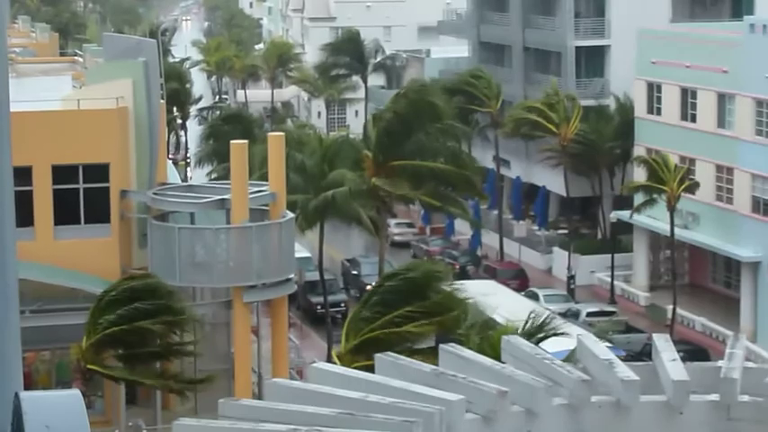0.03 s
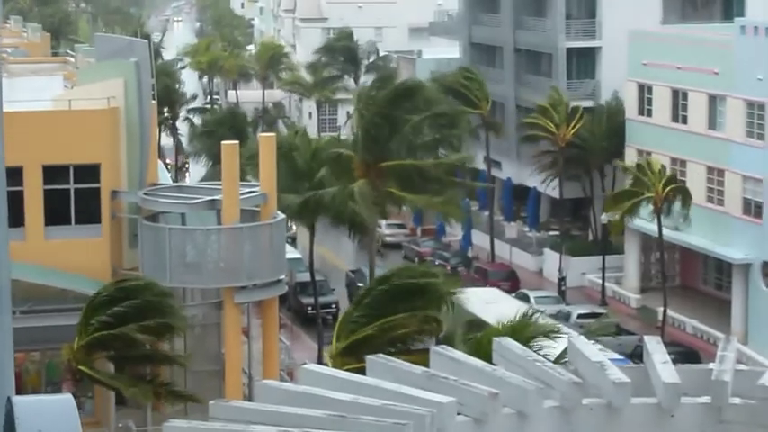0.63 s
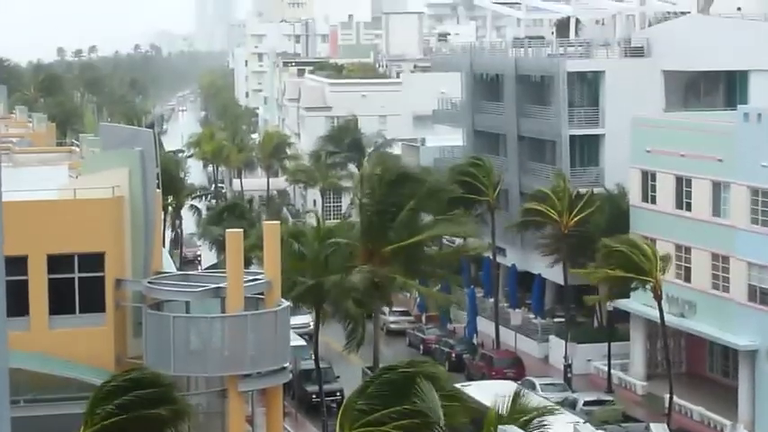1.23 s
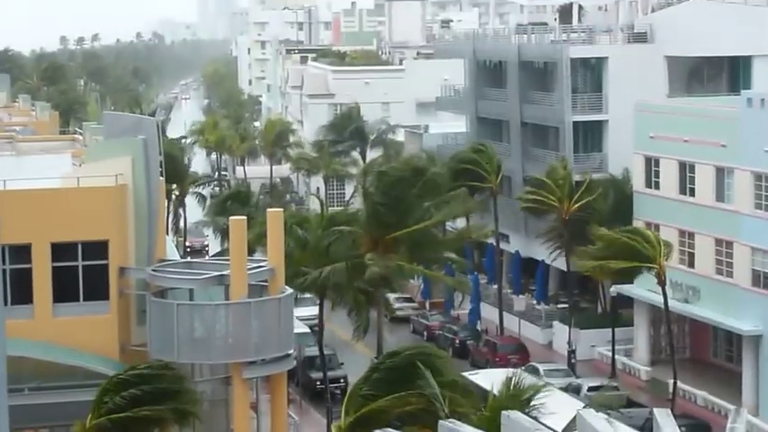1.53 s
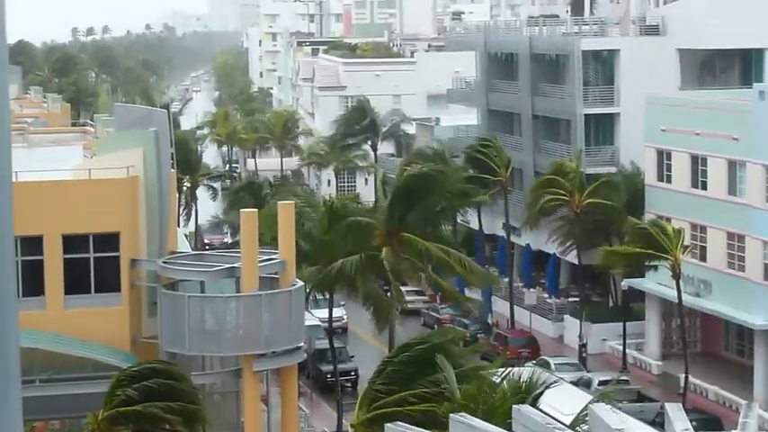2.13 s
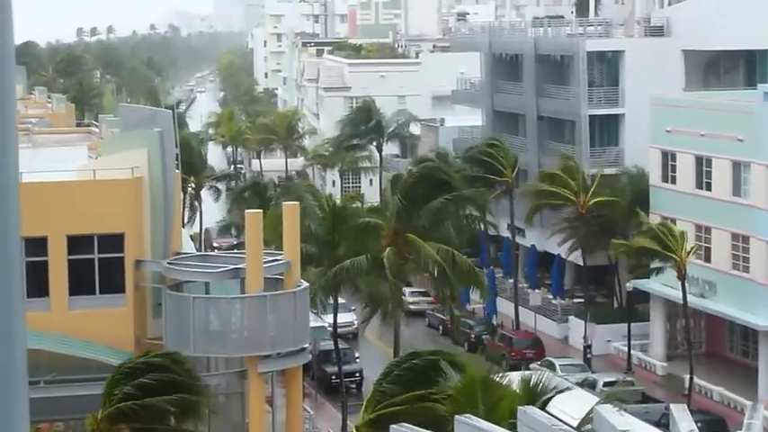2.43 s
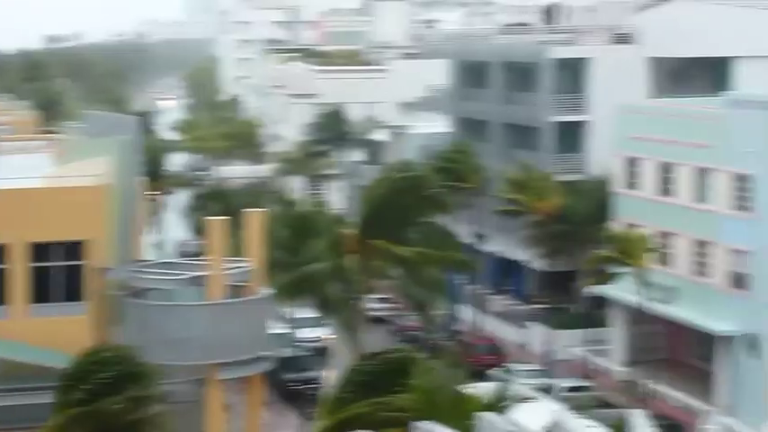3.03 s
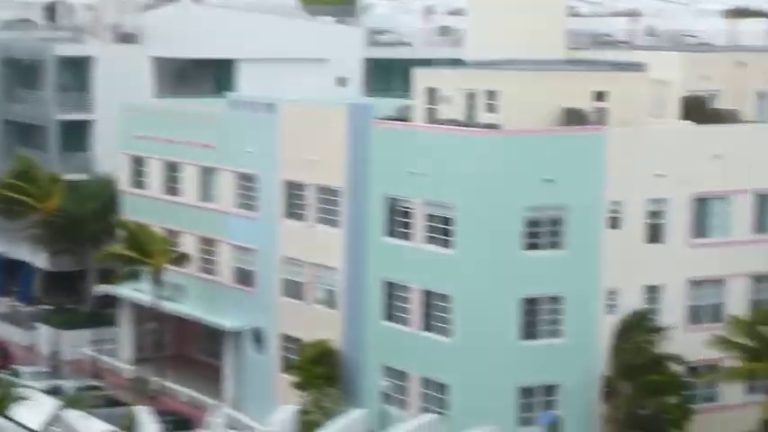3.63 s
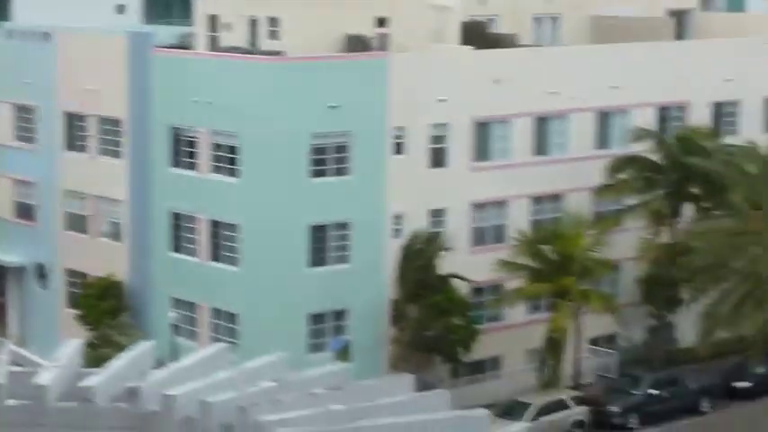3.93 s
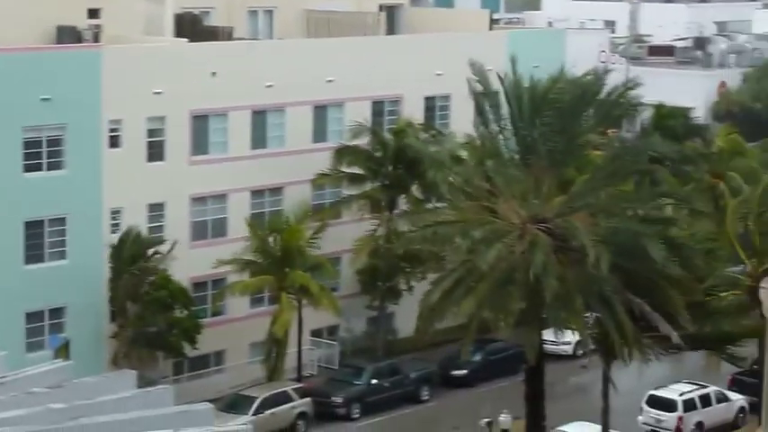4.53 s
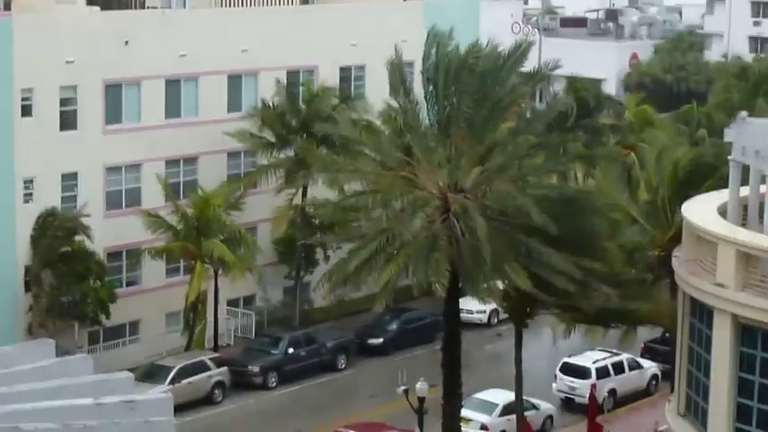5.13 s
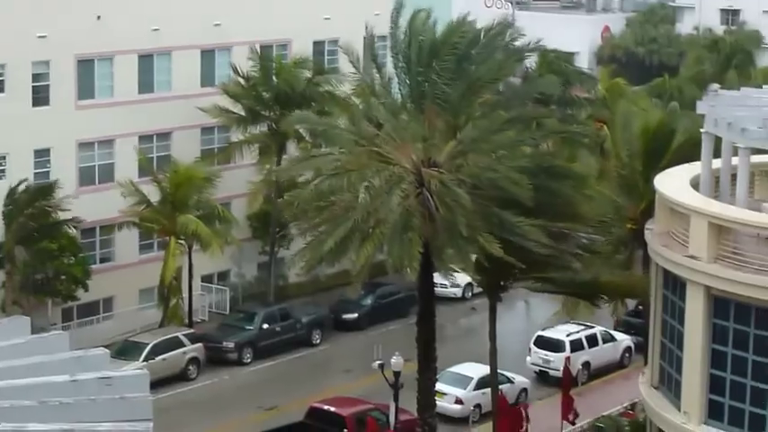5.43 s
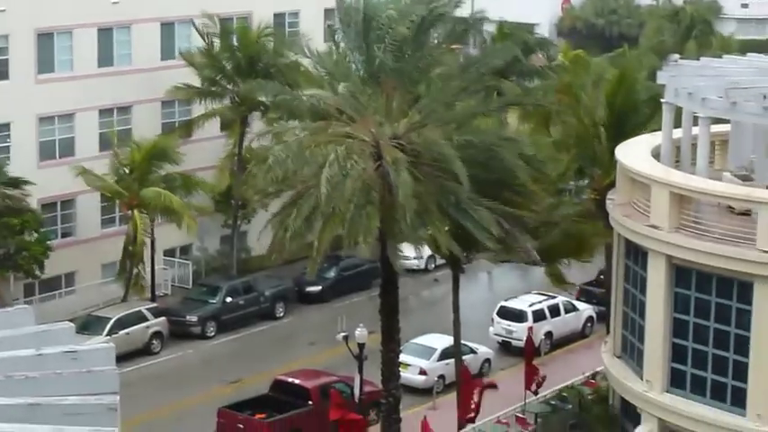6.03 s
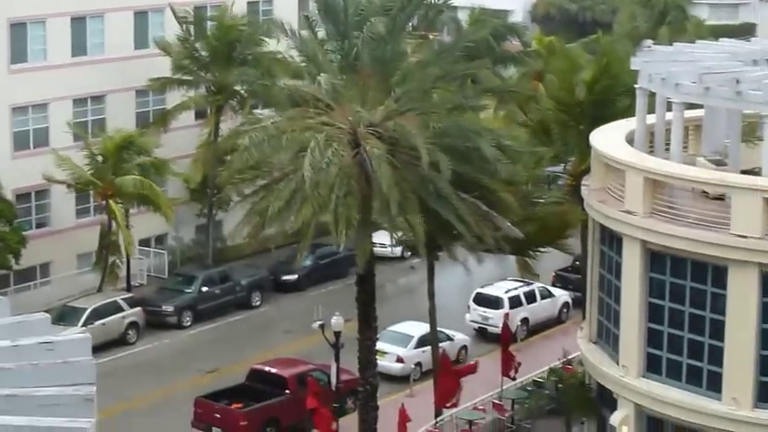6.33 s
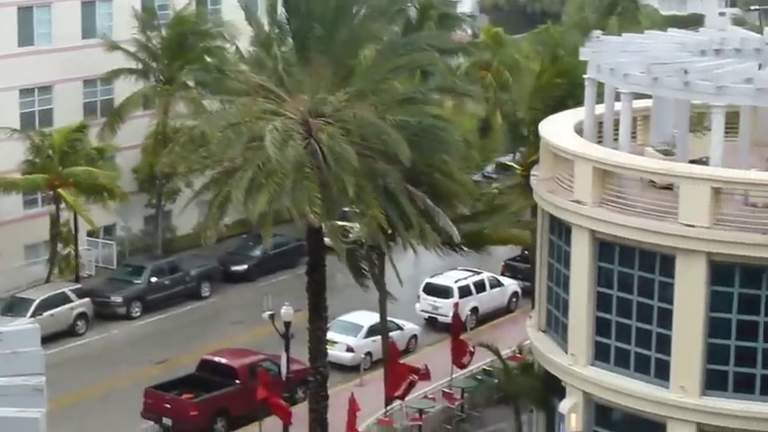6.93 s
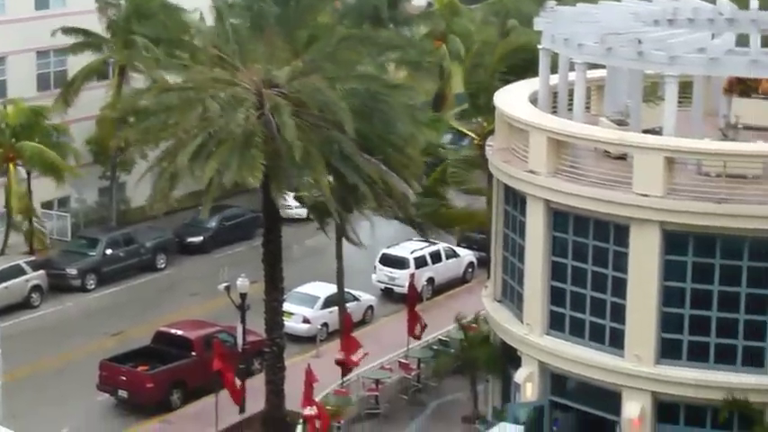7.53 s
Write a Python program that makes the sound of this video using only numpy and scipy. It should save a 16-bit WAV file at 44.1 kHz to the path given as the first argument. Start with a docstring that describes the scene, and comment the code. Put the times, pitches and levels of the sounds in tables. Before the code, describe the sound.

Gusty wind thumps against the microphone over a deep outdoor roar and the hiss of thrashing palm leaves, briefly whistling.

```python
"""Storm wind on a roof terrace.

Below, the air roars between the buildings and hisses through a street of palms; now and then it
whistles thinly at an edge. Right at the microphone, eddies hit the two ports as short low thuds,
vortices moan and one drop ticks on the housing. The limiter ducks the rush under the hardest blasts."""
import sys
import numpy as np
from scipy import signal
from scipy.io import wavfile
from scipy.ndimage import uniform_filter1d

SR = 44100
rng = np.random.default_rng(int(sys.argv[2]) if len(sys.argv) > 2 else 0)


def file_out(sig):
    """Save sig as 16-bit WAV at sys.argv[1]."""
    # one column per channel
    cols = np.atleast_2d(sig).T
    # limit, then scale
    lim = np.clip(cols, -1, 1)
    pcm = np.round(lim * 32767).astype(np.int16)
    wavfile.write(sys.argv[1], SR, pcm)


N = 343539
CUTOFF_HZ = 8742   # top of the recorder's range

# how alike the street sounds at the two ports: (frequency [Hz], left-right correlation [-1..1])
RUSH_LIKENESS = [(60, 0.99), (250, 1), (560, 0.98), (870, 0.96), (1370, 0.74), (2130, 0.58), (3330, 0.4),
                 (5210, 0.43), (8000, 0.77)]


def from_db(db):
    """Decibels to gain."""
    return 10 ** (np.asarray(db) / 20)


def rms_one(x):
    """Scaled to an rms of 1."""
    return x / np.sqrt(np.mean(x ** 2) + 1e-20)


def panned(pan_db):
    """Left and right gains, the left louder by pan_db."""
    return from_db(np.array([[.5], [-.5]]) * pan_db)


def in_time(rows):
    """The columns of a curve at every sample."""
    s, *columns = np.transpose(rows)
    return [np.interp(np.arange(N) / SR, s, column) for column in columns]


def at_hz(points, hz):
    """A spectrum's value at these frequencies."""
    points_hz, values = np.transpose(points)
    return np.interp(np.log(hz), np.log(points_hz), values)


def around(s, half_s):
    """The samples that a swell at s reaches."""
    start, stop = np.clip([(s - 4 * half_s) * SR, (s + 4 * half_s) * SR], 0, N)
    return slice(int(start), int(stop))


def swell(s, half_s):
    """A smooth rise and fall around s, at a quarter of its height half_s away."""
    out, near = np.zeros(N), around(s, half_s)
    t = np.arange(near.start, near.stop) / SR
    out[near] = np.exp(-np.log(4) * ((t - s) / half_s) ** 2)
    return out


def drift(rate_hz):
    """A random wander with an rms of 1, mostly slower than rate_hz."""
    hop = 40
    pole = np.exp(-2 * np.pi * rate_hz * hop / SR)
    noise = rng.standard_normal(N // hop + 2002)
    slow = signal.lfilter([1], [1, -2 * pole, pole * pole], noise)[2000:]   # once settled
    return np.interp(np.arange(N) / hop, np.arange(len(slow)), rms_one(slow))


def noise_bands(spectrum, likeness, low_hz, count):
    """Half-octave bands of stereo noise whose powers add up to 1: (centres [Hz], bands)."""
    edges = low_hz * 2 ** (np.arange(count + 1) / 2)
    centres, bands = np.sqrt(edges[1:] * edges[:-1]), []
    gains = from_db(at_hz(spectrum, centres)) * np.sqrt(centres)
    for low, high, hz, gain in zip(edges, edges[1:], centres, gains / np.linalg.norm(gains)):
        band_pass = signal.butter(3, [low, high], "band", fs=SR, output="sos")
        mid, side = rms_one(signal.sosfilt(band_pass, rng.standard_normal((2, N))))
        alike = np.clip(at_hz(likeness, hz), -1, 1)
        stereo = np.sqrt((1 + alike) / 2) * mid + np.sqrt((1 - alike) / 2) * side * [[1], [-1]]
        bands.append(gain * stereo)
    return centres, bands


def street_roar(level_db, patchy_db):
    """The far, deep rush of air between the buildings reaches both ports nearly alike."""
    # colour of the roar: (frequency [Hz], relative density [dB])
    spectrum = [(25, -18.5), (55, -12.5), (100, -1), (170, 0.5), (240, 0.5), (340, -2.5), (480, -4.5),
                (680, -5.5), (900, -10), (1200, -17.5), (1700, -17.5), (3000, -31), (8000, -52)]
    _, bands = noise_bands(spectrum, RUSH_LIKENESS, low_hz=25, count=15)
    return sum(band * from_db(patchy_db * drift(4.6)) for band in bands) * from_db(level_db)


def frond_hiss(level_db, calm_top_db, sizzle_hz, flutter_db, patchy_db):
    """Palm leaves thrash below the terrace: a wide hiss that flutters, its top coming and going."""
    # colour of the hiss: (frequency [Hz], relative density [dB])
    spectrum = [(500, -15.5), (1000, 5.5), (1500, 0), (2200, -1), (3200, -0.5), (4700, -1.55), (6700, -6)]
    # the top of the hiss flares up: (time [s], half-length [s], rise [dB])
    sizzles = [(1.985, 0.21, 9.5), (3.893, 0.068, 5), (4.07, 0.27, 7)]
    sizzle_db = calm_top_db + sum(rise_db * swell(s, half_s) for s, half_s, rise_db in sizzles)
    centres, bands = noise_bands(spectrum, RUSH_LIKENESS, low_hz=500, count=8)
    top_share = 1 / (1 + (sizzle_hz / centres) ** 6)
    hiss = sum(band * from_db(share * sizzle_db + patchy_db * drift(8.6))
               for share, band in zip(top_share, bands))
    return hiss * from_db(level_db + flutter_db * drift(25))


def edge_whistle(waver_hz, flutter_db, pan_db):
    """Wind at an edge: a thin, wavering whistle that swells and fades at a steady rate in dB."""
    # swells of the whistle: (time [s], half-length [s], top level [dB], pitch [Hz])
    whistles = [(0.0, 0.11, -46, 4950), (1.27, .22, -48.5, 4950), (1.63, .18, -51.5, 4958),
                (1.98, .13, -56, 4560), (3.0, 0.13, -55.5, 4922), (3.17, .22, -44.5, 4922)]
    t, tone = np.arange(N) / SR, 0
    waver_cycles = waver_hz * np.cumsum(drift(65)) / SR
    for s, half_s, level_db, hz in whistles:
        envelope = from_db(level_db) * np.exp(-np.log(4) * np.abs(t - s) / half_s)
        tone += np.sqrt(2) * np.sin(2 * np.pi * (hz * t + waver_cycles)) * envelope
    flutter = rms_one(from_db(flutter_db * drift(50)))
    return tone * flutter * panned(pan_db)


def housing_drop(low_hz):
    """A drop hits the microphone housing: one dry tick with no bass."""
    # the impact: (time [s], nominal peak [dB])
    impacts = [(5.28, -3.5)]
    click = np.zeros(N)
    for s, peak_db in impacts:
        # scaled up, as only the part under the cut-off is heard
        click[round(s * SR)] = -from_db(peak_db) * SR / (2 * CUTOFF_HZ)
    return signal.sosfilt(signal.butter(1, low_hz, "high", fs=SR, output="sos"), click)


def vortex_moans(sag_hz_per_s, flutter_db, flutter_hz):
    """Each slowing vortex at the microphone gives a short, throbbing low tone that sags in pitch."""
    # vortices: (time [s], half-length [s], level [dB], pitch [Hz], left over right [dB])
    vortices = [(0.06, 0.014, -19, 257.2, 2), (0.447, 0.013, -23, 287, -3), (6.45, 0.023, -21, 273, 1),
                (6.889, .037, -24.5, 241.6, 2), (6.965, 0.043, -27, 133.5, 2), (7.68, 0.016, -34, 210, 1)]
    t, out = np.arange(N) / SR, 0
    for s, half_s, level_db, hz, pan_db in vortices:
        pitch_hz = np.clip(hz - sag_hz_per_s * (t - s), 60, 320)
        tone = np.sqrt(2) * np.sin(2 * np.pi * np.cumsum(pitch_hz) / SR)
        out += tone * from_db(level_db) * swell(s, half_s) * panned(pan_db)
    return out * from_db(flutter_db * drift(flutter_hz))


def pressure_surges():
    """The hardest blasts press on both ports: a one-sided push, too slow to hear, driving the limiter."""
    # blasts: (time [s], peak [dB], half-length [s])
    blasts = [(0.08, -3.5, 0.029), (0.274, -0.5, 0.028), (0.322, -0.5, 0.02), (0.473, 0, 0.037),
              (0.583, -3.5, 0.036), (0.773, -6.5, 0.033), (0.861, -5.5, 0.027), (1.401, -6.5, 0.025),
              (1.749, -6.5, 0.02), (1.787, -5.5, 0.028), (1.921, -5.5, 0.026), (2.345, -3, 0.037),
              (3.675, -6.5, 0.024), (3.726, -5, .027), (3.797, -5.5, .027), (6.521, -3, 0.027),
              (6.612, -5, 0.03), (7.282, -5, 0.025), (7.319, -1, 0.027), (7.696, -8.5, .027)]
    return sum(from_db(peak_db) * swell(s, half_s) for s, peak_db, half_s in blasts)


def port_slaps():
    """Tight eddies sweep across the two ports in turn, each one cycle of push and pull."""
    # slaps: (time [s], peak [dB], pitch [Hz], left over right [dB], lag of the right port [s])
    slaps = [(0.0099, -12, 218, 2, -0.012), (0.0573, -8, 240, -1.5, 0.0034), (0.258, -7, 111, -6, 0.00051),
             (0.3197, -4, 200, 0, -.0045), (0.3281, -9, 230, -5, -0.004), (0.543, -10.5, 1180, 4, -.0003),
             (0.7687, -14, 110, -2, 0.0085), (0.7916, -13, 200, 6, .0025), (0.9514, -13, 170, 0, 0.0044),
             (1.133, -19, 260, 1, -0.0053), (1.3919, -17, 220, -14.5, 0.0012),
             (1.7124, -10, 230, 9, 0.00093), (1.9057, -16, 170, -7, -0.0028),
             (2.0123, -16.5, 170, -10, -0.0055), (2.196, -18, 180, -12, -.0008),
             (2.2858, -19.5, 130, -11, -0.00051), (2.3233, -11.5, 330, 5, .004),
             (2.3427, -10, 200, 3, -.001), (2.728, -24, 180, 8, 0.0045), (3.3052, -17.5, 208, -7, -0.0068),
             (3.661, -15, 180, -1, 0.0042), (3.7054, -19, 180, -10, -0.0029),
             (3.7193, -14, 520, 2, -0.0053), (3.9277, -19.5, 130, -9, 0.00045),
             (6.2388, -20, 220, -10, -0.00051), (6.322, -13, 193, -10, -0.0037),
             (6.3703, -9.5, 261, -7, .0018), (6.4348, -12.5, 220, 0, 0.001), (6.457, -15, 216, -2, -.0024),
             (6.5003, -17, 328, -1, -0.0038), (6.5168, -7, 200, -10, -0.0064),
             (6.5931, -6.5, 270, 7, 0.00008), (6.6596, -10.5, 180, 6, 0.0058),
             (6.6669, -12, 150, 5, -0.0024), (6.7945, -16.5, 260, 8, -0.0035),
             (6.9364, -15, 170, 10.5, -0.0057), (7.0516, -15, 131, -3, -0.0037),
             (7.278, -13.5, 91, 10, -0.00024), (7.6697, -11, 218, 0.5, .001)]
    t, out = np.arange(N) / SR, np.zeros((2, N))
    for s, peak_db, hz, pan_db, lag_s in slaps:
        near = around(s, 1 / hz + abs(lag_s))
        phase = np.pi * hz * (t[near] - s - lag_s * np.array([[0], [1]]))
        pulse = (1 - 2 * phase ** 2) * np.exp(-phase ** 2)
        out[:, near] += from_db(peak_db) * panned(pan_db) * pulse
    return out


def eddies(restless_db, bed_tilt_db):
    """Eddies swell over a bed of restless air: (gain at each port, tilt of the rumble [dB/octave])."""
    # restless air at the microphone between the eddies: (time [s], level [dB])
    turbulence = [(0, -39), (.17, -38.5), (.33, -24), (.6, -23.5), (.74, -25), (.85, -25.5), (1.05, -38.5),
                  (1.33, -33.5), (1.9, -35), (2.7, -32.5), (3.0, -42.5), (3.6, -32.5), (4.1, -39),
                  (4.35, -45), (4.7, -63.5), (6.1, -57), (6.3, -29.5), (6.6, -30.5), (6.95, -47.5),
                  (7.35, -34), (7.55, -35), (7.79, -33)]
    # eddies that hit the microphone: (time [s], level [dB], half-length [s], left over right [dB])
    buffets = [(0.003, -21, 0.021, -2), (0.064, -9.5, 0.019, 1.5), (0.277, -12.5, 0.033, 0.5),
               (0.326, -10.5, 0.015, -2.5), (0.445, -19, 0.014, -1), (0.539, -12, 0.033, 0),
               (0.59, -16, 0.037, -3), (0.785, -19, 0.021, 7), (0.826, -27, 0.02, -3.5),
               (0.971, -23, 0.023, 1.5), (1.132, -18.5, 0.008, 2), (1.28, -24, 0.021, 2.5),
               (1.4, -10.5, 0.02, 0.5), (1.714, -20, 0.013, -1.5), (1.776, -19.5, 0.059, 2),
               (1.922, -20.5, 0.035, 2.5), (2.01, -22, 0.012, -10), (2.194, -24.5, 0.013, -6),
               (2.295, -21, 0.0082, -7), (2.34, -10.5, 0.02, -1), (2.421, -16, 0.03, -0.5),
               (2.659, -19.5, 0.012, 2.5), (2.723, -18.5, 0.0068, 4.5), (2.797, -23.5, 0.0084, -8),
               (3.199, -24, 0.033, 3.5), (3.298, -20, 0.016, 1), (3.383, -21.5, 0.027, 1.5),
               (3.663, -15, 0.025, -8.5), (3.713, -17, 0.03, 1), (3.78, -15.5, 0.011, 2),
               (3.949, -24.5, 0.034, -2), (4.117, -27, 0.034, -1), (6.237, -24, 0.022, -7),
               (6.436, -18.5, 0.034, 0), (6.522, -12.5, 0.037, 0.5), (6.595, -14.5, 0.029, -0.5),
               (6.655, -17.5, 0.041, 2.5), (6.792, -21.5, 0.045, -3.5), (6.88, -22.5, 0.049, 0),
               (6.936, -26, 0.066, 1), (7.045, -29, 0.042, 4), (7.27, -25, 0.02, -5),
               (7.317, -18.5, 0.045, 6), (7.689, -22, 0.033, 4)]
    neutral_db, tilt_per_db, max_tilt = -22, 0.6, 2.5   # stronger eddies are brighter
    bed_db = in_time(turbulence)[0] + restless_db * np.array([drift(17), drift(23)])
    power = from_db(bed_db) ** 2
    weighted_tilt = power * bed_tilt_db
    for s, level_db, half_s, pan_db in buffets:
        near = around(s, half_s)
        eddy_power = (from_db(level_db) * panned(pan_db) * swell(s, half_s)[near]) ** 2
        power[:, near] += eddy_power
        weighted_tilt[:, near] += eddy_power * min(tilt_per_db * (level_db - neutral_db), max_tilt)
    # the colour is the mix of bed and eddies, each weighted by its power
    return np.sqrt(power), weighted_tilt / power


def buffeting(level_db, restless_db, bed_tilt_db, pivot_hz, even_s):
    """Wind right on the microphone: each port rumbles and thuds as the eddies hit it."""
    # colour of the rumble: (frequency [Hz], relative density [dB])
    spectrum = [(20, -19.5), (40, -8.5), (70, -1.5), (130, 3), (230, -1), (330, -4.5), (450, -10),
                (700, -19.5), (1100, -33.5), (2000, -44.5)]
    # how alike the two ports rumble: (frequency [Hz], left-right correlation [-1..1])
    port_likeness = [(30, 0.47), (100, 0.1), (250, -0.12), (450, -0.25), (800, -0.94), (1500, -0.92)]
    strength, tilt_db = eddies(restless_db, bed_tilt_db)
    centres, bands = noise_bands(spectrum, port_likeness, low_hz=18, count=14)
    octaves = np.clip(np.log2(centres / pivot_hz), -1.5, 1.3)
    swirl = sum(band * from_db(octave * tilt_db) for octave, band in zip(octaves, bands))
    # the swirl is held at even strength, so the eddies alone set the lumps
    span = int(even_s * SR)
    swirl_power = uniform_filter1d(uniform_filter1d(np.mean(swirl ** 2, axis=0), span), span)
    return swirl / np.sqrt(swirl_power) * strength * from_db(level_db)


def limiter_gain(pressure, limit_db, attack_s, release_db_per_s):
    """Turns down quickly by as much as the pressure exceeds the limit, and recovers at a steady rate."""
    power = uniform_filter1d(np.mean(pressure ** 2, axis=0), size=441)   # 10 ms
    over_db = np.maximum(10 * np.log10(np.abs(power) + 1e-12) - limit_db, 0)
    recovery_db = release_db_per_s * np.arange(N) / SR
    held_db = np.maximum.accumulate(over_db + recovery_db) - recovery_db
    pole = np.exp(-1 / (attack_s * SR))
    return from_db(-signal.lfilter([1 - pole], [1, -pole], held_db))


def scene():
    """From the terrace: the street's roar and hiss at a distance, the buffeting air up close."""
    # gusts in the street: (time [s], level [dB], extra level of the roar [dB])
    gusts = [(0.0, -37, 6), (0.15, -34.5, 5), (0.25, -35.5, 5.5), (0.6, -46, 7), (0.8, -44.5, 5.5),
             (1.0, -41.5, 6), (1.3, -37, 5), (2.1, -40.5, 5), (2.6, -40, 4), (3.1, -36.5, 5.5),
             (3.45, -40, 4), (4.0, -41, 8), (4.7, -32.5, 6), (5.25, -32, 5.5), (5.36, -33, 6.5),
             (6.22, -31, 5.5), (6.4, -40, 7), (6.78, -38, 4.5), (6.98, -39.5, 6), (7.2, -35.5, 5.5),
             (7.45, -35, 6), (7.79, -39, 6)]
    gust_db, roar_extra_db = in_time(gusts)
    roar = street_roar(gust_db + roar_extra_db, patchy_db=1.04)
    hiss = frond_hiss(gust_db + 0.61, calm_top_db=-1.0, sizzle_hz=5300, flutter_db=0.5, patchy_db=0.62)
    thuds = buffeting(level_db=-0.04, restless_db=4.0, bed_tilt_db=-3.5, pivot_hz=175, even_s=0.014)
    whistle = edge_whistle(waver_hz=27, flutter_db=3, pan_db=4.5)
    moans = vortex_moans(sag_hz_per_s=1200, flutter_db=0.5, flutter_hz=31)
    at_microphone = housing_drop(low_hz=600) + moans + pressure_surges() + port_slaps() + thuds
    return roar + hiss + whistle + at_microphone


def record(dry):
    """The recorder: a bass cut, a limiter that senses even the pressure below it, and a dulled top."""
    bass_cut = signal.butter(10, 28, "high", fs=SR, output="sos")
    ducking = limiter_gain(dry, limit_db=-10.5, attack_s=0.0029, release_db_per_s=48.5)
    limited = signal.sosfilt(bass_cut, dry) * ducking
    treble_roll_off = signal.firwin(31, 7230, window="boxcar", fs=SR)
    steep_cut = signal.firwin(301, CUTOFF_HZ, window=("kaiser", 8), fs=SR)
    low_pass = np.convolve(treble_roll_off, steep_cut)
    return signal.fftconvolve(limited, low_pass[None], mode="same", axes=1)


dry = scene()
out = record(dry)
file_out(out)
```